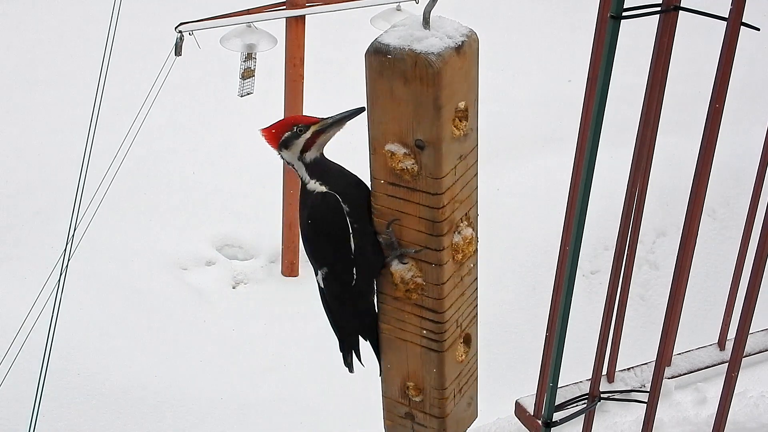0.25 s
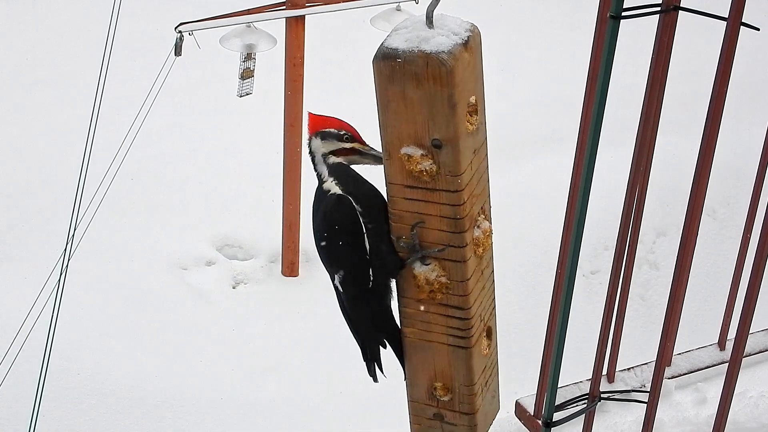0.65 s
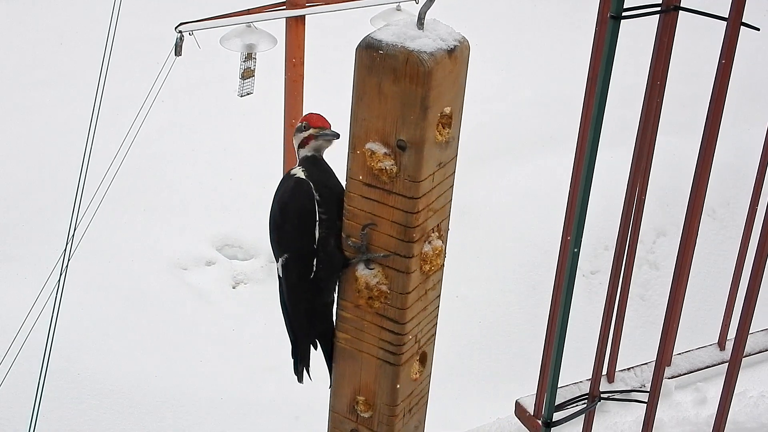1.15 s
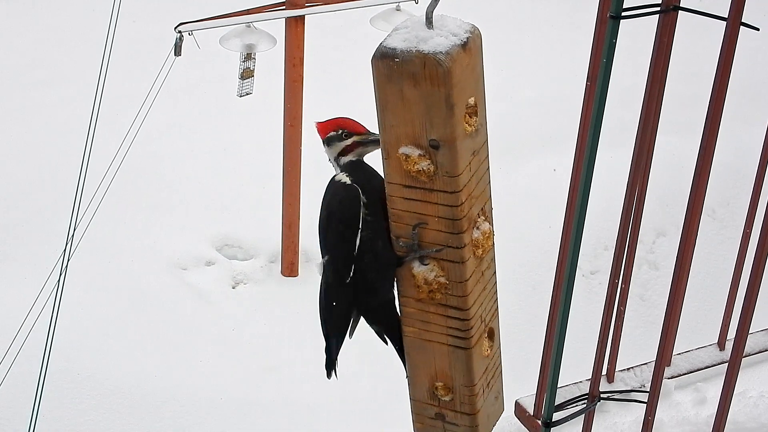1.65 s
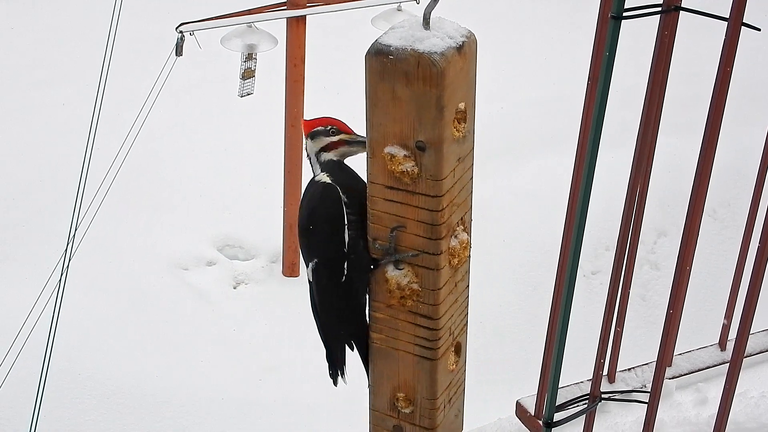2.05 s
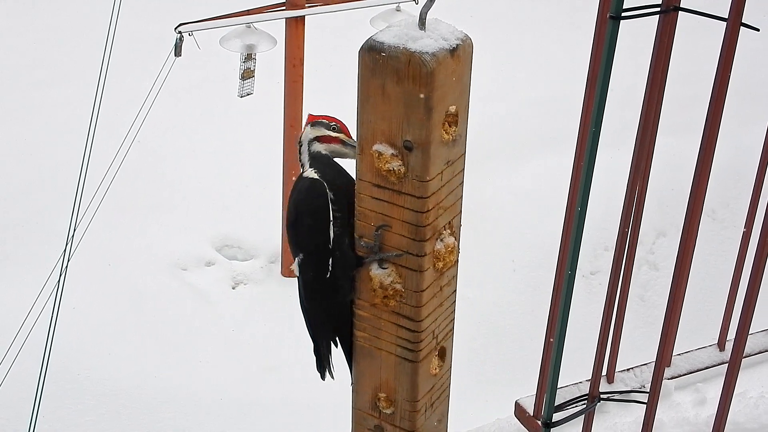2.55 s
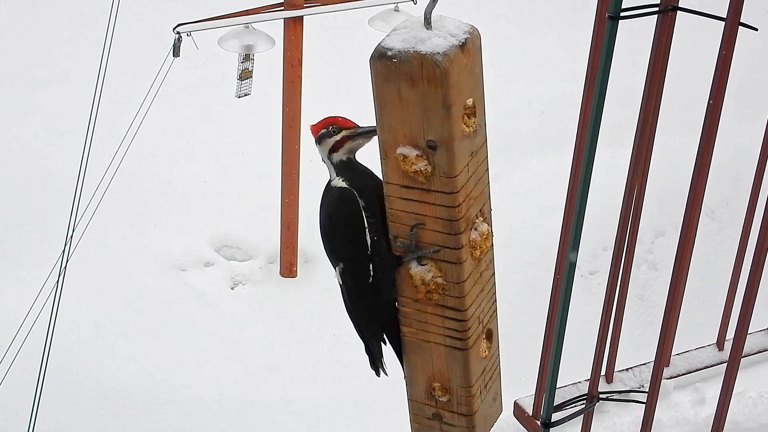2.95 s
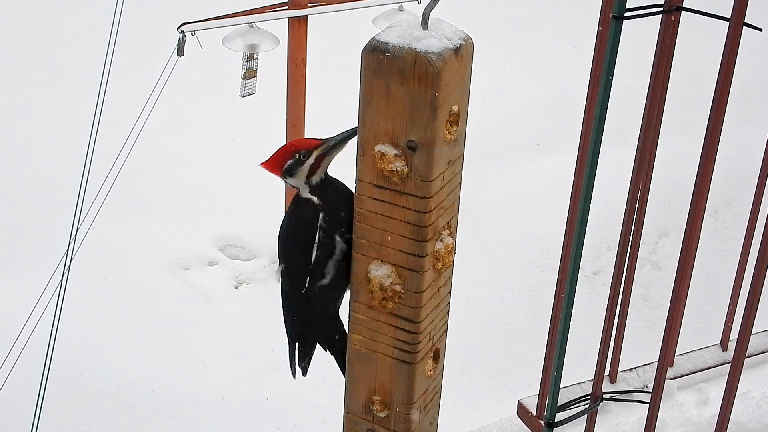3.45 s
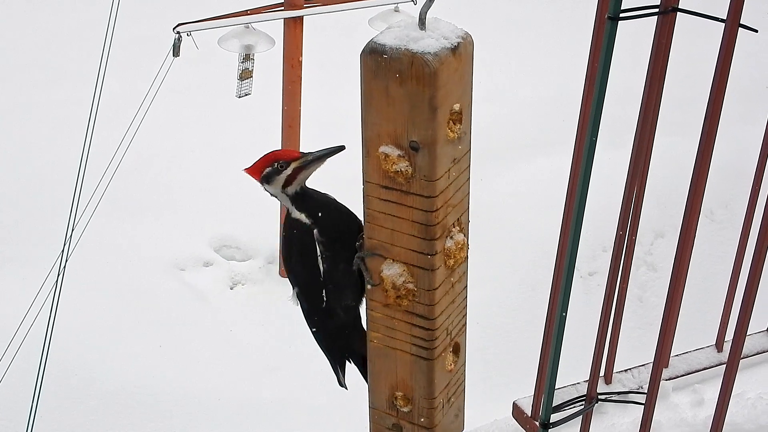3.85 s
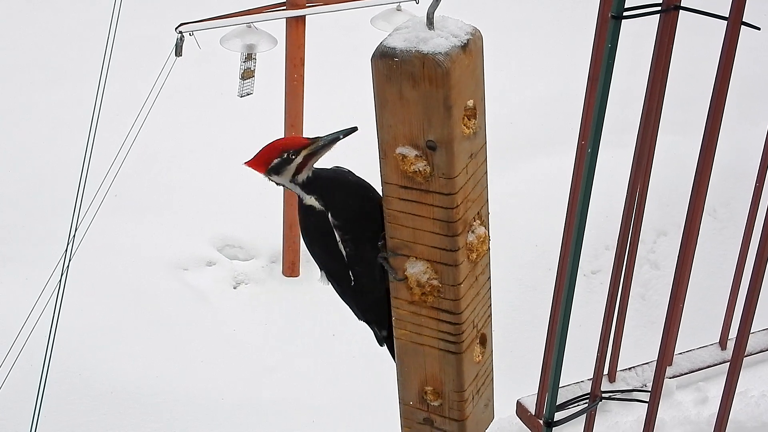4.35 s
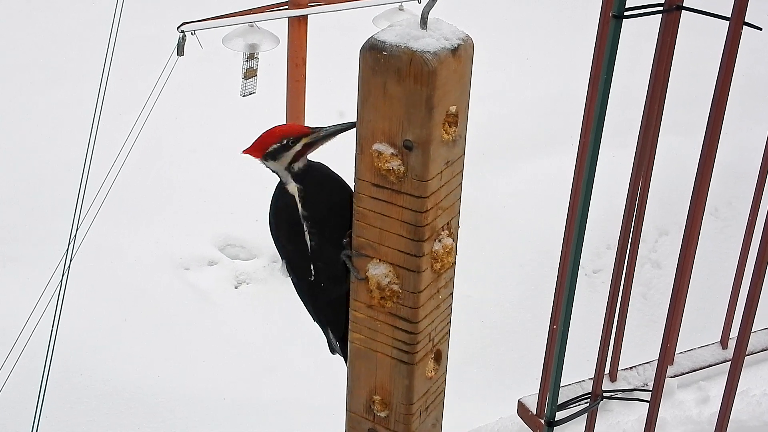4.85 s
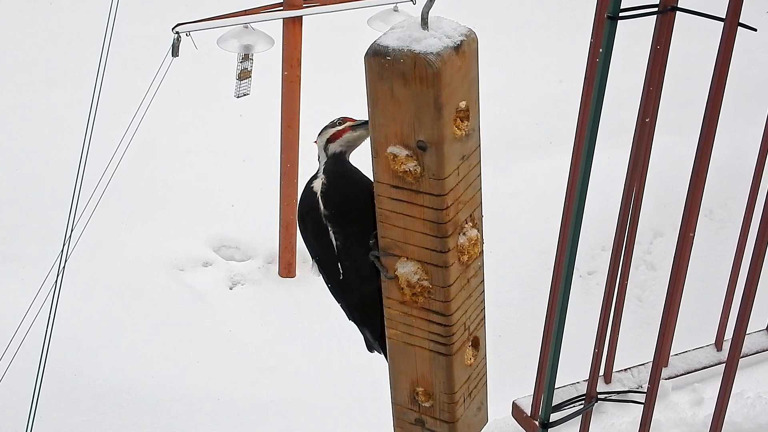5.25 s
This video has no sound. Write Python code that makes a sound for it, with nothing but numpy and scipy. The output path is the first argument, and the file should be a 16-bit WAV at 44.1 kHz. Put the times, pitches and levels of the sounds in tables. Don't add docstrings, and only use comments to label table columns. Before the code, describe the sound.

A large woodpecker close by repeats short, arched, slightly nasal cluck-like calls, about four a second, for four seconds, with dull echoes off walls. A faint buzzy finch trill follows, then a few light beak taps on a hanging log with claw and chip ticks. Small birds twitter far off over soft air, distant traffic and light microphone hiss. Close outdoor stereo, bird almost central.

```python
import sys
import numpy as np
from scipy import signal
from scipy.fft import rfft, irfft, next_fast_len
from scipy.io import wavfile

SR = 44100
rng = np.random.default_rng(int(sys.argv[2]) if len(sys.argv) > 2 else 0)


def undo_db(level):
    steps = np.asarray(level, float) / 20
    return 10 ** steps


def materialize(psi):
    bounded = np.clip(np.atleast_2d(psi).T, -1, 1)
    quanta = np.round(bounded * 32767).astype(np.int16)
    wavfile.write(sys.argv[1], SR, quanta)


N = 243431


def rms_one(x):
    return x / np.sqrt(np.mean(x ** 2) + 1e-20)


def in_time(rows, t):
    s, *columns = np.transpose(rows)
    return [np.interp(t, s, c) for c in columns]


def at_hz(points, hz):
    table_hz, value = np.transpose(points)
    return np.interp(np.log(hz), np.log(table_hz), value)


def bump(hz, centre, width):
    return 1 / (1 + ((hz - centre) / width * 2) ** 2)


def passed(x, order, edges, kind):
    return signal.sosfilt(signal.butter(order, edges, kind, fs=SR, output="sos"), x)


def shaped(x, gain_at):
    size = next_fast_len(N + SR)
    hz = np.maximum(np.arange(size // 2 + 1) * SR / size, 1)
    return irfft(rfft(x, size) * gain_at(hz), size)[..., :N]


def drift(rate):
    r = np.exp(-2 * np.pi * rate / SR)
    wander = signal.lfilter([1], [1, -2 * r, r * r], rng.standard_normal(N + SR))
    return rms_one(wander[SR:])


def add(out, s, piece):
    i = round(s * SR)
    out[i:i + len(piece)] += piece[:N - i]


CLIMB, CLIMB_S, CLIMB_BEND, CLIMB_PER_S = 0.113, 0.016776, 2.293, 2.58
FALL, FALL_S, FALL_BEND, FALL_PER_S = 0.1064, 0.01952, 1.47, 3.15
USUAL_S = 0.0427
SAG_S, SAG_PITCH, SAG_DB = 0.003, 0.8336, -27.5


def arched_pitch(t, length, top_s, top_hz, dying):
    extra_s = length - USUAL_S
    before = np.clip((top_s - t) / CLIMB_S, 0, None)
    after = np.clip((np.minimum(t, length) - top_s) / FALL_S, 0, None)
    climb = (CLIMB + CLIMB_PER_S * extra_s) * before ** CLIMB_BEND
    fall = (FALL + FALL_PER_S * extra_s) * after ** FALL_BEND
    return top_hz * (1 - climb - fall) * (1 - (1 - SAG_PITCH) * dying)


# f/Hz, level/dB
BEAK_SHUT = [(2300, -5.5), (2850, -12), (3400, -8), (3850, -6), (4300, -6.5), (4800, -13.5), (5300, -19.5),
             (5750, -11.5), (6700, -21), (7600, -25.5), (9500, -36.5)]
# f/Hz, level/dB
BEAK_OPEN = [(2300, -5.5), (2700, -4.5), (3500, -9.5), (3750, -7.5), (4400, -8.5), (4750, -15.5),
             (5400, -16.5), (6300, -13), (7300, -22), (9000, -35), (10500, -40.5)]
FLUTTER_DB, FLUTTER_S = 4, 0.003


def beak_partials(t, pitch, order, opened):
    hz = order * pitch
    beak = undo_db((1.5 - opened) * at_hz(BEAK_SHUT, hz) + opened * at_hz(BEAK_OPEN, hz))
    beak = beak / np.sqrt((beak ** 2).sum(0))
    knots = np.arange(-.01, .09, FLUTTER_S)
    jumps = rng.normal(0, FLUTTER_DB, (len(beak), len(knots)))
    flutter = np.array([np.interp(t, knots, row) for row in jumps])
    return beak * undo_db(flutter * np.sqrt(order / 6))


# start t/s, length t/s, time to the top t/s, top pitch f/Hz, level/dB
CALLS = [(0.1881, 0.046, 0.02206, 989.7, -13), (0.39, 0.0448, 0.02092, 967.7, -15),
         (0.6044, 0.04557, 0.02144, 955.6, -16), (0.9222, 0.04182, 0.0221, 964.6, -14),
         (1.1274, 0.03888, 0.0173, 970.5, -15.5), (1.3925, 0.0394, 0.02026, 955.1, -15),
         (1.6082, 0.0377, 0.01927, 948.2, -15), (1.8595, 0.04033, 0.02084, 979, -16.5),
         (2.1415, 0.03842, 0.01804, 973.9, -16.5), (2.376, 0.03954, 0.0199, 965.1, -17.0),
         (2.7002, 0.03754, 0.0182, 958.5, -18.0), (2.918, 0.04057, 0.02041, 979.3, -15.5),
         (3.1632, 0.04124, 0.01947, 964, -16.5), (3.554, 0.04793, 0.01997, 1030, -16),
         (3.7671, 0.04156, 0.0206, 975.4, -14), (4.0088, 0.0464, 0.02063, 952, -19)]
# share of the call, first partial level/dB, second level/dB, upper ones level/dB
SWELL = [
    (0, -25, -11, -23),
    (.12, -20.5, -10, -21.5),
    (.3, -12.5, -8.5, -16),
    (.58, -15.5, -3, -14),
    (.76, -15.5, -0.19, -17.5),
    (.91, -19.5, -1.86, -13.5),
    (1.0, -20.5, -2, -11),
]
# t/s, delay of the pane's echo t/s, echo level/dB, level of partials outside the throat/dB
HEAD = [
    (.19, 0.0071, -18, 0),
    (.61, 0.011, -19, 2.5),
    (.92, .009, -15, -1.5),
    (2.92, .009, -10, 0.5),
    (3.17, 0.01, -20, 2),
    (3.56, .017, -15.5, 3.5),
    (3.77, 0.011, -27.5, 1.5),
    (4.01, .013, -19, 4),
]
# lower f/Hz, upper f/Hz
PANE_HZ = [1280, 3200]
RISE_S = 0.0035
OPENS_AT, OPENING_TIME = 0.753, 0.242
THROAT_HZ, THROAT_DB_PER_KHZ = 1943, -88
WEAK_HZ, WEAK_DB_PER_KHZ = 926, -85


def woodpecker():
    out = np.zeros(N)
    order = np.arange(1, 12)[:, None]
    for start, length, top_s, top_hz, level_db in CALLS:
        delay, pane_db, outside_db = in_time(HEAD, start)
        t = np.arange(-RISE_S, length + 2 * SAG_S, 1 / SR)
        share = t / length
        dying = np.clip((t - length) / SAG_S, 0, 1)
        pitch = arched_pitch(t, length, top_s, top_hz, dying)
        opened = 1 / (1 + np.exp(-(share - OPENS_AT) / OPENING_TIME))

        first_db, second_db, upper_db = np.array(in_time(SWELL, share)) + level_db + SAG_DB * dying
        first_db = first_db + opened * WEAK_DB_PER_KHZ * np.clip(WEAK_HZ - pitch, 0, None) / 1000
        second_db = second_db + THROAT_DB_PER_KHZ * np.clip(2 * pitch - THROAT_HZ, 0, None) / 1000
        upper = undo_db(upper_db + outside_db) * beak_partials(t, pitch, order[2:], opened)
        heights = np.vstack([undo_db(first_db + outside_db), undo_db(second_db), upper])

        lag = np.pi * opened * (order > 1) + .12 * order ** 2
        phase = order * 2 * np.pi * np.cumsum(pitch) / SR - lag
        voice = (heights * np.cos(phase)).sum(0)
        rise = np.clip((t - t[0]) / (1.556 * RISE_S), 0, 1) ** 2
        call = np.sqrt(2) * voice * rise * np.clip((t[-1] - t) / SAG_S, 0, 1)
        add(out, start - RISE_S, call)
        add(out, start - RISE_S + delay, undo_db(pane_db) * passed(call, 1, PANE_HZ, "band"))
    return out


# t/s, peak level/dB
TAPS = [
    (4.491, -34),
    (4.671, -32),
    (4.838, -29),
    (5.058, -43.5),
]
# t/s, peak level/dB, centre f/Hz, spread ratio
TICKS = [
    (4.4917, -34.5, 5344, 1.26),
    (4.4927, -31, 2190, 1.41),
    (4.5075, -35.5, 5020, 1.3),
    (4.6719, -37, 3900, 1.4),
    (4.6833, -29.5, 5610, 1.025),
    (4.8385, -37.5, 3000, 1.4),
    (5.0274, -38.5, 6440, 1.436),
    (5.031, -23, 5030, 1.1),
    (5.03, -28, 2156, 1.203),
    (5.057, -28, 2080, 1.2),
]
# f/Hz, level/dB, time to fall 60 dB t/s
LOG = [(789.4, -7.5, 0.214), (939.3, -8.5, 0.085), (1630, -0.5, 0.024), (1654, -4, 0.048),
       (1912, 6, 0.0212), (2217, -3, 0.0304), (2713, -8.5, 0.038), (3200, -3.5, 0.0192),
       (3800, -21, 0.0113)]


def pecking():
    out = np.zeros(N)
    t = np.arange(SR // 8) / SR
    for s, db in TAPS:
        for hz, level_db, t60 in LOG:
            chance_db = rng.normal(0, 2.7)
            fading = undo_db(db + level_db - 8.5 + chance_db - 60 * t / t60)
            add(out, s, fading * np.sin(2 * np.pi * hz * t))
    for s, db, hz, spread in TICKS:
        burst = rng.standard_normal(len(t)) * undo_db(db + 3.5 - 60 * t / 0.021)
        spread = max(spread, 1.1)
        add(out, s, passed(burst, 2, [hz / spread, min(hz * spread, 15000)], "band"))
    return passed(out, 2, 600, "high")


# f/Hz, level/dB
CALL_BALANCE = [(900, .3), (1900, -.1), (2800, -2.4), (4000, -1.7), (7000, -4.5)]
# f/Hz, phase/radians
CALL_LEAD = [(900, .05), (1900, -.17), (2800, .11), (3700, .07), (4700, .3), (6000, -.5)]


def a_little_right(x):
    sides = np.array([[.5], [-.5]])
    return shaped(x, lambda hz: undo_db(at_hz(CALL_BALANCE, hz) * sides) * np.exp(1j * at_hz(CALL_LEAD, hz) * sides))


def glide(length, from_hz, to_hz):
    share = np.arange(int(length * SR)) / (length * SR)
    hz = from_hz + (to_hz - from_hz) * share
    return np.sin(np.pi * share) * np.sin(2 * np.pi * np.cumsum(hz) / SR)


# t/s, length t/s, from f/Hz, to f/Hz, level/dB
WHISTLES = [(0.269, 0.021, 7400, 6540, -65), (0.537, 0.047, 3600, 2983, -68),
            (1.283, 0.06, 4700, 4060, -73.5), (1.922, 0.124, 5300, 5557, -70),
            (2.023, .05, 5400, 4480, -73.5), (2.057, 0.06, 4300, 4196, -74), (2.42, 0.053, 5400, 4680, -69),
            (4.184, 0.035, 3700, 3200, -69), (4.224, 0.037, 3700, 3056, -64),
            (4.261, 0.054, 3600, 3086, -76.5), (4.334, 0.055, 3700, 2817, -68),
            (4.656, 0.0168, 3800, 3517, -67.5), (5.131, 0.05, 7300, 7200, -69),
            (5.031, 0.0386, 3600, 2960, -66), (5.18, 0.0427, 3600, 2870, -66.5),
            (5.433, 0.048, 5100, 5970, -70), (5.46, 0.041, 4600, 5820, -67.5)]


def whistles():
    out = np.zeros(N)
    for s, length, from_hz, to_hz, db in WHISTLES:
        add(out, s, undo_db(db + 16) * glide(length, from_hz, to_hz))
    return out


# t/s, pulses per s, low note f/Hz, low note level/dB, high note level/dB
TRILL = [
    (3.86, 60, 5300, -72.5, -82),
    (3.9, 60, 5300, -58, -63.5),
    (4.06, 62, 5300, -56.5, -56.5),
    (4.2, 66, 5500, -42.5, -61.5),
    (4.25, 68, 5600, -62, -55),
    (4.32, 68, 5700, -50.5, -61.5),
    (4.36, 68, 5200, -59.5, -81),
    (4.39, 68, 4900, -78.5, -77),
]


def finch_trill():
    t = np.arange(N) / SR
    rate, hz, low_db, high_db = in_time(TRILL, t)
    beat = np.cumsum(rate) / SR % 1
    singing = (t > TRILL[0][0]) * (t < TRILL[-1][0])
    pulse = np.sin(np.pi * beat) ** 2 * singing * undo_db(4.4 * drift(25))
    sweep = 1 + .12 * (beat - .5) + .02 * drift(250)
    low = undo_db(low_db) * np.sin(2 * np.pi * np.cumsum(hz * sweep) / SR)
    high = undo_db(high_db) * np.sin(2 * np.pi * np.cumsum(7300 * sweep) / SR)
    return 2 * pulse * (low + high)


# t/s, level/dB
FLOCK = [(0, -58), (.57, -55), (1.23, -60), (2.06, -64.5), (2.54, -56), (2.85, -63), (3.2, -62.5),
         (3.55, -50.5), (3.93, -53.5), (4.2, -45), (4.3, -49.5), (4.55, -53), (5.37, -53.5), (5.52, -44.5)]


def flock():
    out = np.zeros(N)
    for when, a, b, quiet, long, bend in rng.random((1100, 6)):
        hz = 5250 + 800 * (a + b - 1)
        slide = 500 * (bend - .4)
        add(out, when * N / SR, undo_db(-13 * quiet) * glide(.006 + .016 * long, hz - slide, hz + slide))
    (flock_db,) = in_time(FLOCK, np.arange(N) / SR)
    return undo_db(flock_db - 6.5) * rms_one(out)


# delay t/s, level/dB
NEAR_ECHOES = [
    (.016, -27),
    (.041, -29),
    (.052, -32.5),
    (.085, -35.5),
]
YARD_T60_S, YARD_DB, WALL_CUT_HZ = 0.256, -25.5, 2400


def yard(x, near_db):
    t = np.arange(int(.6 * SR)) / SR
    scatter = rng.standard_normal((2, len(t))) * undo_db(-60 * t / YARD_T60_S) * (1 - np.exp(-t / 0.0027))
    response = undo_db(YARD_DB - 30.5 + near_db) * scatter
    for delay, db in NEAR_ECHOES:
        response[:, round(delay * SR)] -= undo_db(db)
    wet = signal.fftconvolve(x[None], response, axes=1)[:, :N]
    return passed(wet, 1, WALL_CUT_HZ, "low")


def railing(x):
    return shaped(x, lambda hz: undo_db(3.5 * bump(hz, 1935, 87)))


def earlier_call():
    band = passed(rng.standard_normal((2, N)), 2, [1450, 2000], "band")
    level_db, t60 = -51, 4.5
    return undo_db(level_db - 60 * np.arange(N) / SR / t60) * rms_one(band)


# t/s, peak level/dB, centre f/Hz
THUDS = [
    (.2, -71.5, 90),
    (0.399, -67.5, 95),
    (0.619, -68, 68),
    (2.84, -75, 59.3),
    (3.179, -66.5, 70),
    (3.579, -72, 99.4),
    (4.55, -62.5, 100),
    (4.75, -61, 130),
    (4.87, -67, 240),
    (5.25, -68, 100),
]


def balcony():
    out = np.zeros((2, N))
    t = np.arange(SR // 4) / SR
    for s, db, hz in THUDS:
        shared, left, right = rng.standard_normal((3, len(t)))
        fading = undo_db(db - 60 * t / 0.2) * np.minimum(t / .015, 1)
        for channel, own in zip(out, (left, right)):
            dull = passed(shared + .8 * own, 1, [hz / 1.4, hz * 1.4], "band")
            add(channel, s, fading * rms_one(dull))
    return out


# f/Hz, likeness from 0 to 1
LIKENESS = [(30, .3), (120, 0.53), (300, 0.747), (1500, 0.839), (4000, 0.16), (7000, 0.054), (10000, 0.02)]


def stereo_noise(spectrum):
    def alike(hz):
        return np.clip(at_hz(LIKENESS, hz), 0, 1)

    mid, side = rng.standard_normal((2, N))
    mid = shaped(mid, lambda hz: undo_db(at_hz(spectrum, hz)) * np.sqrt(1 + alike(hz)))
    side = shaped(side, lambda hz: undo_db(at_hz(spectrum, hz)) * np.sqrt(1 - alike(hz)))
    return rms_one(np.array([mid + side, mid - side]))


# f/Hz, level/dB per Hz
RUMBLE = [(15, -61), (25, -25.5), (118, -5.5), (150, -5), (192, 2), (241, 2.5), (330, -13), (430, -45.5),
          (730, -120)]
# t/s, level/dB
TRAFFIC = [
    (0, -81.5),
    (.34, -70.5),
    (.7, -76),
    (2.9, -76.5),
    (3.55, -73),
    (4.35, -76.5),
    (4.55, -69.5),
    (4.95, -68.5),
    (5.35, -80.5),
    (5.52, -79),
]


def traffic():
    (rumble_db,) = in_time(TRAFFIC, np.arange(N) / SR)
    return undo_db(rumble_db + 0.84 * drift(4.3)) * stereo_noise(RUMBLE)


# f/Hz, level/dB per Hz
AIR = [(160, -48.5), (280, -14), (367, -12.5), (459, -13.5), (502, -10.5), (574, -9), (1160, -6.5),
       (1500, -10), (1760, -4.5), (2520, -13), (2760, -8), (4140, -8.5), (5330, -9.5), (8110, -12.5),
       (10000, -33.5), (13000, -56), (22000, -120)]


def town_air():
    return undo_db(-58.5 + 6) * stereo_noise(AIR)


def fan():
    return undo_db(-75) * rms_one(shaped(rng.standard_normal(N), lambda hz: bump(hz, 506, 25)))


def scene():
    bird = woodpecker() + pecking()
    near = a_little_right(bird) + railing(yard(bird, near_db=0))
    small_birds = whistles() + finch_trill() + flock()
    far = small_birds * undo_db([[-1.5], [1.5]]) + yard(small_birds, near_db=32)
    return near + far + earlier_call() + balcony() + traffic() + town_air() + fan()


def top_cut(x):
    return signal.sosfilt(signal.butter(12, 16460, fs=SR, output="sos"), x)


def record(dry):
    dipped = shaped(dry, lambda hz: 1 - 0.847 * bump(hz, 2520.4, 158.4))
    hiss = undo_db(-73.5 + 7.5) * passed(rng.standard_normal(dry.shape), 1, 1500, "high")
    mixed = passed(dipped + hiss, 2, 70, "high")
    return top_cut(mixed)


dry = scene()
out = record(dry)
materialize(out)
```